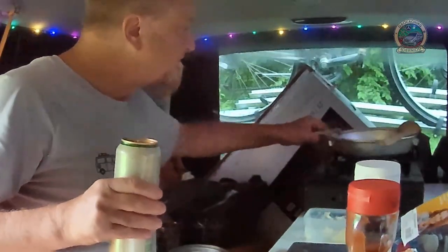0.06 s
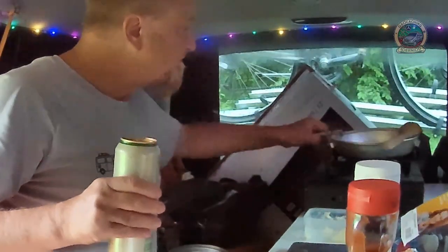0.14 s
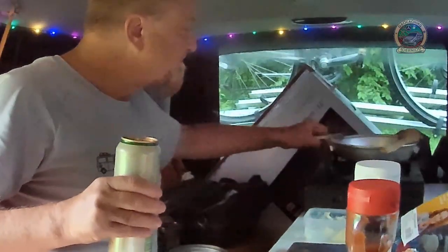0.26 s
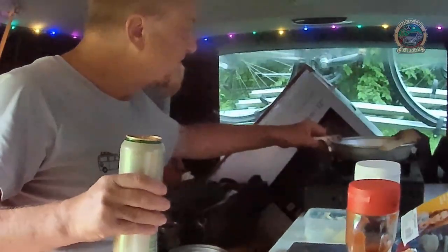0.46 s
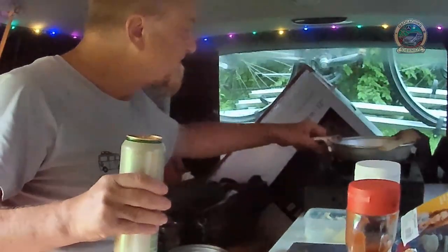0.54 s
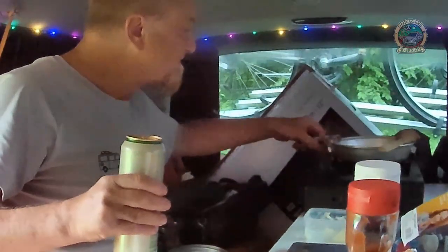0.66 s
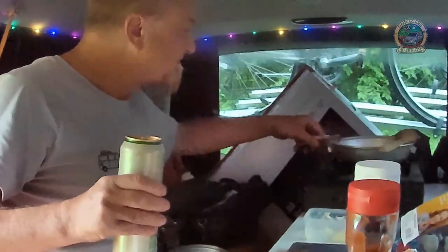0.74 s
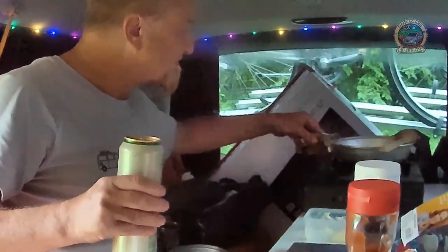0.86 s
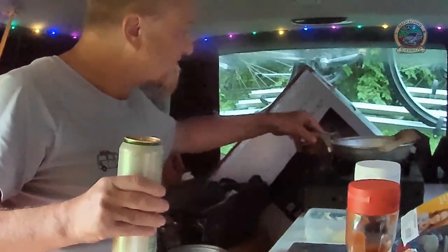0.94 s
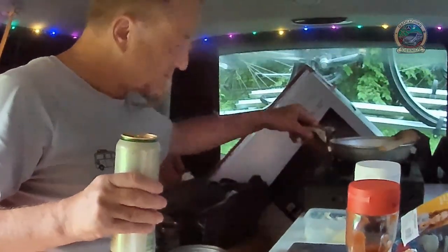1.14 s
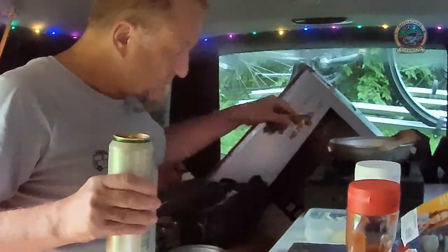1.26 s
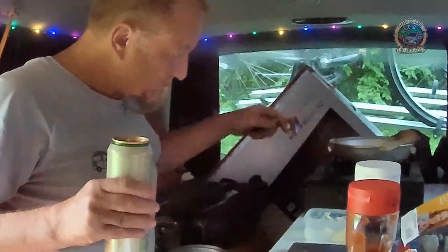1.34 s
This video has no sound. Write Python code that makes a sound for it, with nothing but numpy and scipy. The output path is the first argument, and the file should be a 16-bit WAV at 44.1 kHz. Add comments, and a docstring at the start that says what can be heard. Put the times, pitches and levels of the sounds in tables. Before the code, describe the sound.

A frying pan knocks on a small gas stove's steel grate. After a faint tick at 0.1 s, a hard clattering cluster lands at 0.24-0.28 s, another at 0.44-0.5 s, with short metallic ring, grate rattle and dull counter thumps. Softer taps come near 0.62 s, then light scraping and tiny ticks, and a single clank at 1.07 s. Quiet burner hiss and low rumble continue in the tight, dry cabin.

```python
"""In a cramped camper, a frying pan is knocked and shuffled on the steel grate of a small gas stove.
Quick contacts ring the pan as damped sines, rattle the grate and tick the rim with noise bursts; tiny
contacts make the scrape, low sines the counter thumps, decaying noise the cabin's echo. Noise bands
make burner hiss and cabin rumble, under a thin steady tone; a gain control ducks treble after knocks."""
import sys
import numpy as np
from scipy import signal
from scipy.fft import rfft, irfft
from scipy.io import wavfile
from scipy.ndimage import uniform_filter1d

SR = 44100
rng = np.random.default_rng(int(sys.argv[2]) if len(sys.argv) > 2 else 0)


def persist_wave(psi):
    """Save psi, clipped to +-1, as 16-bit WAV."""
    counts = np.round(np.clip(psi, -1, 1) * 32767).astype(np.int16)
    wavfile.write(sys.argv[1], SR, np.atleast_2d(counts).T)


N = 61739
T = np.arange(N) / SR

# Modes of pan and grate. Each row: frequency in Hz, level in dB, T60 in seconds at ring length 1.
PAN = [(460, -8.5, 0.11), (561.4, 0, 0.087), (745, -7, 0.1), (808, -0.5, 0.041), (869, -2.5, 0.051),
       (1066.5, -5, 0.078), (1130, -9.5, 0.026), (1258, -9, 0.061), (1335, 5, 0.037), (1466.7, 7.5, 0.023),
       (1606, 6.5, 0.022), (1790, 8.5, 0.052), (2036, -17, 0.24), (1990, -2.5, .07), (2350, -10.5, .06)]
PUSH_S = 0.00091  # contact push at 0 dB


def undb(db):
    """Amplitude ratio of a level in dB."""
    return 10 ** (np.asarray(db, float) / 20)


def unit(x):
    """Scale to RMS 1."""
    return x / np.sqrt(np.mean(x ** 2))


def unit_energy(x):
    """Scale an impulse response to energy 1."""
    return x / np.sqrt(np.sum(x ** 2))


def fade(t60_s, t):
    """Exponential decay by 60 dB in t60_s, at least 3 ms."""
    return np.exp(-np.log(1000) * t / max(t60_s, .003))


def band(x, hz, width_hz):
    """Two-pole band-pass."""
    return signal.lfilter(*signal.iirpeak(hz, hz / width_hz, fs=SR), x)


def ring(modes, push_s, spot_hz=1., octaves=1., boost_db=0., length=1., size=1):
    """Decaying sines after a soft push, louder near the struck spot's pitch; peak 1."""
    t = T[:SR // 7]
    x = np.zeros(len(t))
    for k, (hz, db, t60_s) in enumerate(modes):
        sign = (-1) ** (k // size)  # flips every `size` modes
        favour_db = boost_db * np.exp(-(np.log2(hz / spot_hz) / octaves) ** 2)
        x += sign * undb(db + favour_db) * np.sin(2 * np.pi * hz * t) * fade(t60_s * length, t)
    x = x * (1 - np.exp(-(t / push_s) ** 2))
    return x / np.abs(x).max()


def add(out, start_s, x):
    """Mix x into out from start_s, cut at the end."""
    i = int(start_s * SR)
    out[i:i + len(x)] += x[:N - i]


def walk(rate_hz):
    """Random levels held 1 / rate_hz seconds, then smoothed twice over one hold."""
    hold = int(SR / rate_hz)
    steps = np.repeat(rng.standard_normal(N // hold + 1), hold)
    return 1.3 * uniform_filter1d(uniform_filter1d(steps, hold), hold)[:N]


SPOT_OCTAVES, SPOT_DB = 0.12, 20.5  # how widely and strongly the struck spot favours its pitch
SOFTER_PER_DB = .04  # weaker contacts push longer: log of the stretch per dB
RATTLE_DB, RATTLE_T60_S = -17.5, 0.096  # level ahead of the low-pass
RATTLE_HZ, RATTLE_STAGE_WIDTH_HZ, RATTLE_TOP_HZ = 1180, 1760, 2780
CRACK_DB, CRACK_DECAY_S, CRACK_HZ, CRACK_WIDTH_HZ = -11, 0.0035, 4940, 6800
RASP_DB, RASP_DECAY_S = -15.5, 0.014  # gritty tail, relative to the crack
RIM_DB = -4


def grate_rattle():
    """Band-passed noise of the loose grate, before the contacts shape it."""
    noise = band(rng.standard_normal(N), RATTLE_HZ, RATTLE_STAGE_WIDTH_HZ)
    noise = unit(band(noise, RATTLE_HZ, RATTLE_STAGE_WIDTH_HZ))
    return signal.sosfilt(signal.butter(3, RATTLE_TOP_HZ, fs=SR, output="sos"), noise)


def rim_tick(bright):
    """Gritty crack noise, heard directly and through the bright rim modes."""
    # Rim partials. Each row: frequency in Hz, level in dB, T60 in seconds.
    rim_modes = [(2860, 0, .02), (3250, -2, .02), (3800, -4, .02), (4200, -2, .02), (5330, -5, .015),
                 (5900, -3, .015), (6950, -3, .012), (7800, -7, .012)]
    crack = bright * rng.standard_normal(N)
    direct = band(band(crack, CRACK_HZ, CRACK_WIDTH_HZ), CRACK_HZ, 2 * CRACK_WIDTH_HZ)
    rung = signal.fftconvolve(crack, unit_energy(ring(rim_modes, 1 / SR)))[:N]
    return undb(CRACK_DB) * direct + undb(RIM_DB) * rung


def knocks():
    """Each contact rings the pan modes near its spot, shakes the loose grate and cracks the rim."""
    # Contacts of pan and grate. Each row: start in seconds, level in dB, favoured pitch in Hz,
    # treble tick in dB re level (ahead of the tick filters), ring length as a factor on T60.
    contacts = [(0.101, -34.5, 1550, -1.5, 0.34), (.163, -49, 1530, -26, 0.56),
                (.2405, -6.5, 892, -9, 0.43), (0.2434, 2.5, 1450, -60, .6), (.2500, -7.5, 1140, -34, 0.47),
                (.254, -6, 2050, -19, 0.27), (.2600, -13, 1030, -12, 0.46), (.268, -25.5, 1090, -12, 0.56),
                (0.2804, -11, 1560, -20.5, 0.78), (.297, -30.5, 1910, -4, 0.89),
                (.360, -43, 1110, -19, 0.52), (.418, -34.5, 1330, -3, 0.28), (.4360, -6.5, 1730, -28, 0.29),
                (0.4371, 0, 1480, -22.5, 0.92), (.4410, -2.5, 1570, -42, 2.4),
                (0.4451, -12.5, 1105, -23, 0.82), (0.451, -17, 850, -43, 1.9), (.458, -9.5, 1440, -21, 2.3),
                (0.468, -36, 1220, -39, 1.8), (.4915, -18.5, 1780, -42, 0.54), (.4938, -6.5, 1458, -37, .6),
                (0.4977, -5, 904, -24, 0.4), (.512, -45, 1950, -32, 0.49), (0.543, -33.5, 1480, -13, 0.73),
                (.600, -39, 1510, 2, 0.58), (0.609, -27.5, 935, -4.5, 0.38), (0.6212, -20, 1370, -28, 0.34),
                (0.6246, -18, 1656, -40, 0.32), (0.629, -17, 1510, -40, 0.33), (0.638, -32, 940, -51, 0.49),
                (.655, -25, 1340, -30, 0.31), (0.661, -26, 1460, -19, .8), (0.678, -32, 1240, -2.5, 0.6),
                (.683, -29.5, 1280, -17.5, 0.74), (.691, -35.5, 1640, -25, 0.33),
                (.715, -34.5, 1150, -7.5, .8), (.763, -30, 1490, -19, 0.55), (0.778, -44, 1370, 3.5, 1.5),
                (0.801, -37.5, 1290, -5, 0.71), (0.846, -31.5, 1420, -36, 0.3),
                (.886, -32, 1280, -28, 0.97), (.934, -30.5, 1270, -6, 0.7), (.912, -44, 1550, -14, 0.86),
                (0.962, -38.5, 1380, -22, 2.4), (0.993, -32.5, 1523, -4.5, 0.42),
                (1.0733, -9.5, 1553, -26, 1.08), (1.078, -19, 1850, -23, 0.36),
                (1.0815, -25, 767, -35, 0.2), (1.0848, -32, 1970, -27, 0.43), (1.091, -53, 1050, -27, .6),
                (1.11, -30, 1500, -14, 0.91), (1.21, -38.5, 1550, -1, 0.75)]
    pan, shake, bright = np.zeros(N), np.zeros(N), np.zeros(N)
    t = T[:SR // 4]
    burst = np.exp(-t / CRACK_DECAY_S) + undb(RASP_DB) * np.exp(-t / RASP_DECAY_S)
    burst *= 1 - np.exp(-t / PUSH_S)
    for start_s, level_db, spot_hz, tick_db, length in contacts:
        push_s = PUSH_S * np.exp(-SOFTER_PER_DB * level_db)
        rung = ring(PAN, push_s, spot_hz, SPOT_OCTAVES, SPOT_DB, length, size=3)
        shaken = (1 - np.exp(-t / push_s)) * fade(RATTLE_T60_S, t)
        add(pan, start_s, undb(level_db) * rung)
        add(shake, start_s, undb(level_db + RATTLE_DB) * shaken)
        add(bright, start_s, undb(level_db + tick_db) * burst)
    return pan + shake * grate_rattle() + rim_tick(bright)


SCRAPE_PER_S, SCRAPE_SPREAD_DB = 700, 2.5  # mean contact rate; mean of the exponential dB spread


def scrape():
    """Tiny uneven contacts through the pan's modes while it shuffles on the grate."""
    # Shuffle level, silent-like -90 dB outside. Each row: time in seconds, level in dB.
    shuffle = [(0.3, -53.5), (0.428, -49), (0.616, -53.5), (1.25, -73)]
    draw = rng.random((2, N))
    hits = draw[0] < SCRAPE_PER_S / SR
    strength = undb(-SCRAPE_SPREAD_DB * np.log(draw[1] + 1e-6))
    grains = hits * strength * rng.choice([-1, 1], N)
    rung = signal.fftconvolve(grains, ring(PAN, PUSH_S))[:N]
    time_s, db = np.array(shuffle).T
    return unit(rung) * undb(np.interp(T, time_s, db, left=-90, right=-90))


THUMP_PUSH_S, THUMP_OCTAVES, THUMP_DB = 0.0024, 0.34, 12  # push; width and strength of favouring


def counter():
    """Low damped modes of the light cabinet under the stove, thumped by the knocks."""
    # Thumps. Each row: start in seconds, level in dB, favoured pitch in Hz.
    thumps = [(0.2429, -15.5, 90.9), (.282, -22.5, 104), (.330, -31, 85), (0.439, -19.5, 137),
              (0.457, -24, 73.3), (0.498, -29.5, 145), (.532, -40.5, 60.4), (0.628, -30, 101),
              (0.653, -36, 67.6), (0.688, -39, 122), (0.73, -44, 59), (1.079, -36.5, 121), (1.109, -35, 70)]
    # Cabinet modes. Each row: frequency in Hz, level in dB, T60 in seconds.
    cabinet_modes = [(42, -25, .15), (61.7, 7.5, 0.16), (78, 5.5, 0.18), (104.2, 15.5, 0.057),
                     (146, -3.5, 0.3), (188, -21, 0.049), (270, -10, 0.069)]
    out = np.zeros(N)
    for start_s, db, spot_hz in thumps:
        thump = ring(cabinet_modes, THUMP_PUSH_S, spot_hz, THUMP_OCTAVES, THUMP_DB)
        add(out, start_s, undb(db) * thump)
    return out


CABIN_DB, CABIN_T60_S, CABIN_LOWPASS_HZ = -20, 0.072, 3300


def cabin(near):
    """Echo of the cramped cabin: decaying low-passed noise from 2 ms on."""
    t = T[:SR // 4]
    noise = signal.lfilter(*signal.butter(1, CABIN_LOWPASS_HZ, fs=SR), rng.standard_normal(len(t)))
    echo = noise * fade(CABIN_T60_S, t) * (t > .002)
    return undb(CABIN_DB) * signal.fftconvolve(near, unit_energy(echo))[:N]


BURNER_DB = -40  # RMS
SWELL_DB, FLICKER_DB = .7, 1.45  # dB per unit of walk: all bands together; each alone
WHINE_HZ, WHINE_DB = 11251, -80  # thin steady tone


def burner():
    """Third-octave bands of hiss and rumble that swell together and flicker alone, plus the tone."""
    # Spectrum of hiss and rumble. Each row: frequency in Hz, relative density in dB per Hz.
    spectrum = [(20, 4), (45, -5), (76, -10.5), (150, -22), (354, -25), (500, -30.5), (753, -21),
                (1240, -23.5), (2240, -25), (2800, -35), (4200, -32), (5000, -37.5), (6500, -35),
                (8500, -41), (11000, -50), (15800, -52)]
    hz, db = np.array(spectrum).T
    f = np.arange(N // 2 + 1) * SR / N + 1  # +1 keeps the log finite
    colour = undb(np.interp(np.log(f), np.log(hz), db))
    swell = walk(3.86)
    out = np.zeros(N)
    for centre_octave in np.arange(4, 14.4, 1 / 3):  # log2 of Hz
        share = np.clip(1 - np.abs(np.log2(f) - centre_octave) * 3, 0, 1) ** .5
        level = undb(SWELL_DB * swell + FLICKER_DB * walk(5))
        out += level * irfft(rfft(rng.standard_normal(N)) * colour * share, N)
    whine = undb(WHINE_DB) * np.sin(2 * np.pi * WHINE_HZ * T)
    return unit(out) * undb(BURNER_DB) + whine


def scene():
    """Pan sounds with their cabin echo, counter thumps and burner, in mono."""
    near = knocks() + scrape()
    return (near + cabin(near) + counter() + burner())[None]


DUCK_ABOVE_DB, DUCK_RATIO, DUCK_RELEASE_S, DUCK_SPLIT_HZ = -61.5, 1.198, 0.062, 1830
TOP_HZ = 15650


def record(dry):
    """Gain control turns the treble down after loud sound; peaks clip; the top is cut."""
    p = np.exp(-1 / (DUCK_RELEASE_S * SR))
    late = np.roll(dry, 300, axis=1)  # control lags by 300 samples
    heard = np.sqrt(signal.lfilter([1 - p], [1, -p], late ** 2))
    gain = np.maximum(heard / undb(DUCK_ABOVE_DB), 1) ** (1 / DUCK_RATIO - 1)
    low = signal.sosfiltfilt(signal.butter(2, DUCK_SPLIT_HZ, fs=SR, output="sos"), dry)
    mixed = np.clip(low + gain * (dry - low), -1, 1)
    return signal.sosfilt(signal.ellip(8, .2, 70, TOP_HZ, fs=SR, output="sos"), mixed)


dry = scene()
out = record(dry)
persist_wave(out)
```